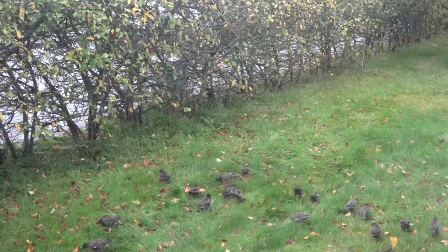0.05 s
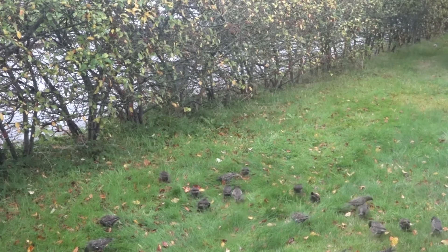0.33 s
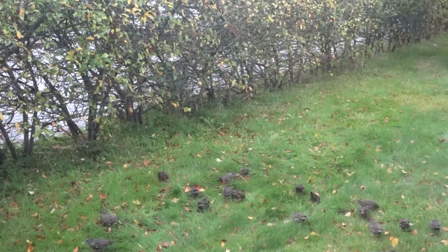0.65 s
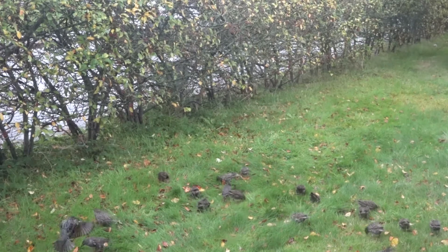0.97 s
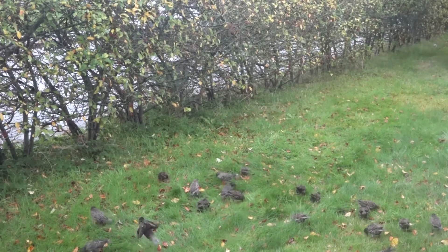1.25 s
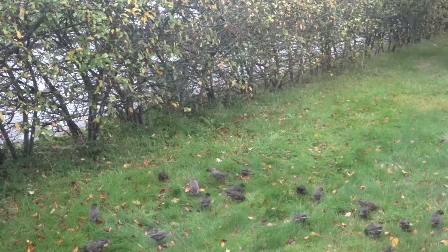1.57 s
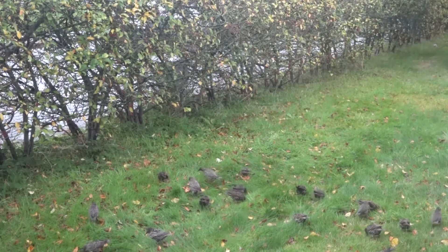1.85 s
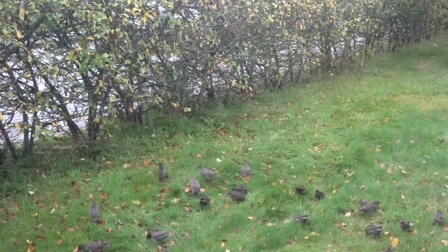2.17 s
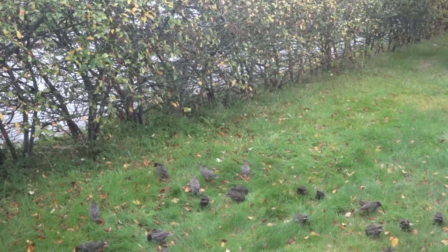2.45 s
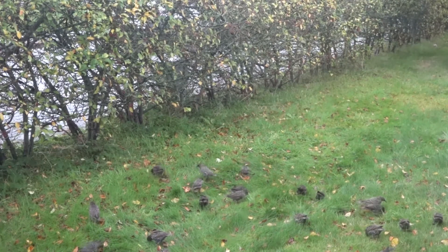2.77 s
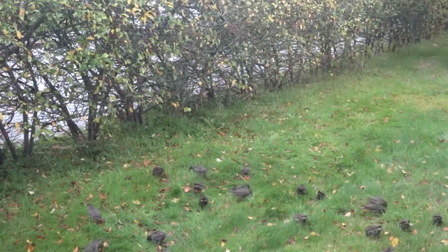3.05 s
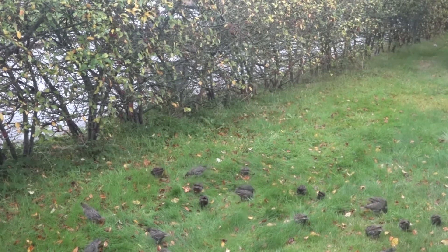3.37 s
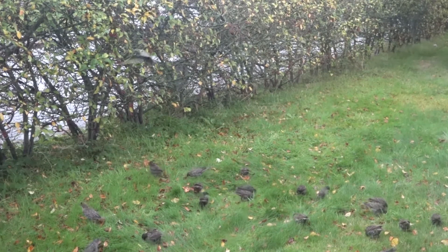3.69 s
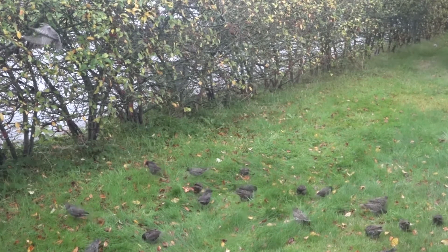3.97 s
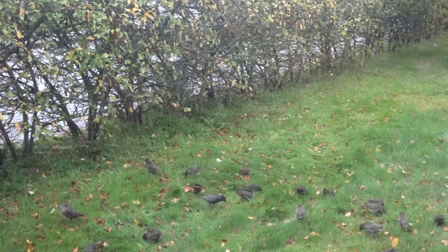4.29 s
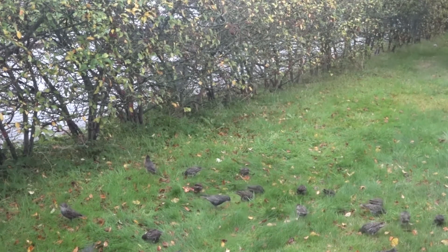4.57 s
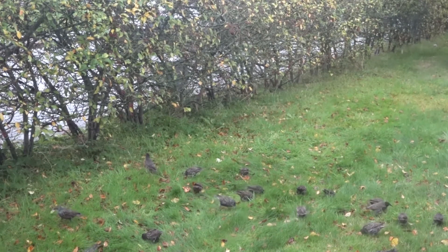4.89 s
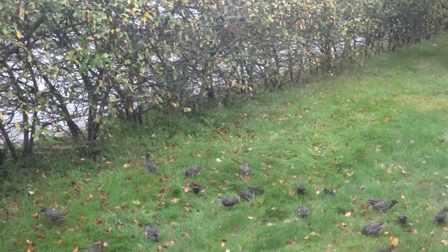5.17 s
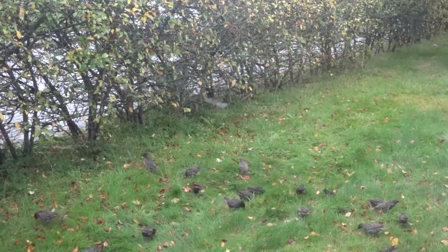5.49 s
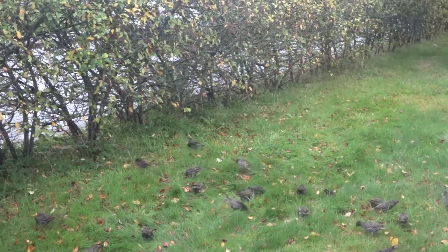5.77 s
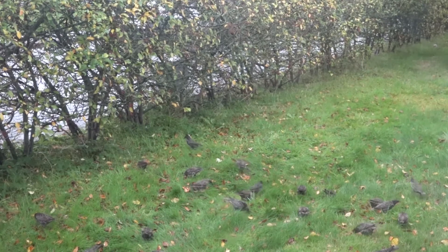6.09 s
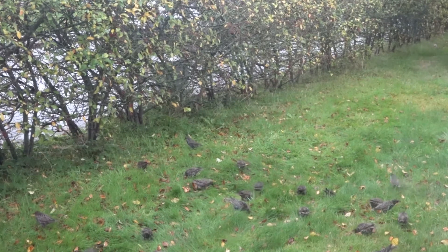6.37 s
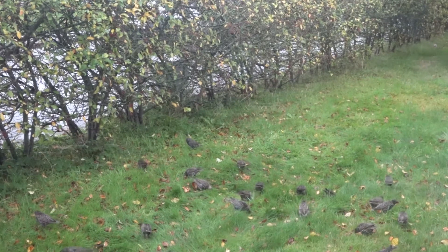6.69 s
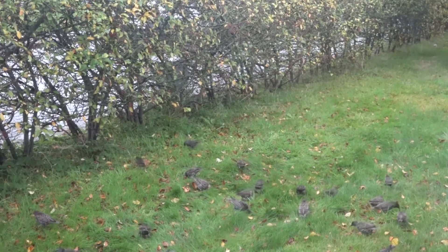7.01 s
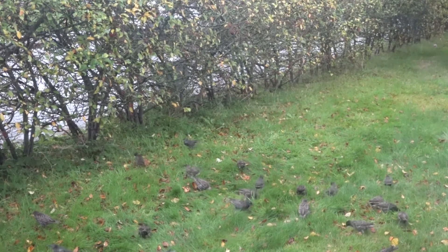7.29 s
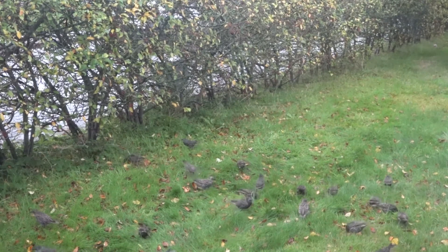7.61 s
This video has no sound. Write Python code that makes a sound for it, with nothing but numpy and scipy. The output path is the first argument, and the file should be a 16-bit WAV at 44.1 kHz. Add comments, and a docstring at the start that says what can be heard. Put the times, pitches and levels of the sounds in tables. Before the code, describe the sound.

A flock of starlings calls on a lawn beside a hedge for nearly eight seconds, making a dense, bright chatter with only tiny lulls. Near birds, mostly to the right, overlap short thin whistles, buzzy trills, harsh creaky rasps, sharp pips and little runs of dry bill clicks. Behind them, many more twitter, scold and pipe steadily. Quick pips stand out around 0.6 and 1.3 seconds, and rasps around 2.3, 3, 4.7, 5.5 to 6 and 7 seconds. Lower, fluty notes come through at about 4.5, 6.4 and 7.4 seconds. The calls carry a slight, short outdoor echo. Underneath, a light breeze makes a soft, uneven rush, and a distant motor hums very faintly. A soft, low puff of wind brushes the microphone at about 7.3 seconds while the birds keep calling.

```python
"""Thin arched whistles, buzzy trills, harsh rasps and bill clicks sound close by, mostly to the right,
over the chatter of many birds farther off: a flock of starlings is feeding on a lawn by a hedge.
A bird sings with its syrinx, a two-sided voice box: a steady tone whistles, uneven pulses rasp.
The hedge scatters every call; under it lie a faint distant motor and a little wind on the microphone."""
import sys
import numpy as np
from scipy import signal
from scipy.fft import rfft, irfft, next_fast_len
from scipy.io import wavfile

SR = 44100
rng = np.random.default_rng(int(sys.argv[2]) if len(sys.argv) > 2 else 0)


def log_audio(samples):
    """Write samples as a 16-bit WAV file to the path given in sys.argv[1]."""
    # one column per channel
    frames = np.atleast_2d(samples).T
    # limit to full scale, then quantise
    limited = np.clip(frames, -1, 1)
    pcm = np.round(limited * 32767).astype(np.int16)
    wavfile.write(sys.argv[1], SR, pcm)


N = 337365
CALL_T = np.arange(SR // 4) / SR  # seconds within one call
HIGH_HZ = 5430  # divides the thin, high sounds from the lower ones


def whistlers():
    """Near birds whistle, the pitch tracing a tilted arch; the high ones sit farther to the right."""
    # thin high whistles, then low fluty ones: t/s, length/s, f/Hz, glide/Hz, level/dB, buzz/0-1
    whistles = [ (0, 0.096, 11150, 98, -46, 0.3), (0, 0.038, 7350, -300, -35.5, 0.1),
                (0.074, 0.053, 6270, 0, -35, 0.83), (0.917, 0.063, 7300, -500, -43, 0.27),
                (1.022, 0.09, 8250, 120, -36, 0.03), (1.153, 0.063, 7660, 700, -36.5, 0.8),
                (1.276, 0.055, 7830, 1102, -35.5, 0.4), (1.383, 0.099, 6450, -1100, -38.5, 0.8),
                (1.56, 0.048, 8140, 150, -32, 0.17), (1.622, 0.072, 8500, 202, -34, 0.04),
                (1.688, 0.056, 7500, -400, -30, 0.16), (1.903, 0.057, 7230, 400, -38, 0.3),
                (2.084, .073, 8130, 400, -38, 0.73), (2.255, 0.1, 8230, -1100, -35.5, 0.5),
                (2.348, 0.15, 7220, -150, -32.5, 0.3), (2.395, 0.088, 7840, 0, -37, 0.04),
                (2.506, 0.069, 7780, 200, -34.5, 0.4), (2.764, 0.099, 8150, 302, -39, .2),
                (2.876, 0.089, 6730, -100, -37, 0.02), (2.9, 0.08, 8420, -80, -39.5, 0),
                (2.92, 0.09, 7270, -600, -37, 0.06), (3.02, 0.032, 7350, 300, -30.5, 0.57),
                (3.077, .075, 6550, 0, -39.5, 0.6), (3.16, .125, 8070, 200, -38, 0.48),
                (3.825, 0.18, 7030, -600, -38.5, 0.75), (4.094, 0.19, 7930, -100, -38, 0.16),
                (4.353, 0.033, 8130, -100, -35, 0.2), (4.514, 0.036, 6600, 0, -37, 0.34),
                (4.67, 0.03, 7450, 200, -36, 0.5), (4.734, 0.047, 7680, 400, -34, 0.83),
                (4.981, 0.059, 8330, -100, -35.5, 0.25), (5.107, 0.072, 8300, 0, -40, 0.2),
                (5.247, 0.026, 7950, 340, -35, 0.8), (5.424, 0.032, 8000, -300, -36.5, 0.4),
                (5.947, 0.089, 8160, -100, -40, 0.02), (6.098, 0.016, 8070, 0, -34.5, 0.63),
                (6.679, 0.17, 7580, -150, -35, 0.49), (6.735, 0.045, 6700, 100, -40, 0),
                (6.958, 0.077, 8700, 100, -40.5, 0.03), (7.07, .05, 5830, -50, -41, .05),
                (7.113, 0.035, 7580, -900, -34, .1), (7.229, 0.063, 8260, 250, -30, 0.3),
                (7.239, 0.052, 6470, -1400, -33.5, 0.45), (7.309, 0.095, 8100, -200, -42, 0.43),
                (7.444, .048, 8320, -250, -33, .25), (7.56, .2, 6600, 2, -33, 0.14),
                (1.275, 0.052, 2390, -80, -44.5, 0.1), (1.96, 0.071, 2550, 56, -40, .03),
                (2.059, 0.14, 2700, -58, -42, 0), (0.018, .13, 1409, 0, -48.5, .3),
                (.61, 0.193, 2690, 1, -46, 0.13), (2.224, 0.046, 1576, -120, -45, .1),
                (5.178, 0.041, 3500, 2, -42.5, 0.2), (0.936, 0.038, 2660, 60, -39.5, 0.24),
                (2.671, 0.069, 2656, 42, -40.5, 0.2), (3.321, 0.29, 2590, -8, -44, 0.28),
                (3.86, .11, 2780, 101, -39.5, 0.38), (7.042, 0.27, 1890, 96, -43, 0.66),
                (4.192, 0.075, 1665, -110, -44.5, 0.34), (4.465, 0.041, 2070, -32, -38, 0),
                (4.501, 0.026, 3145, -2, -31, 0.03), (4.799, 0.018, 2610, -100, -37, .1),
                (5.104, 0.054, 1360, 90, -43.5, .02), (6.172, 0.15, 2563, -100, -37.5, 0.24),
                (6.38, .11, 2630, -92, -31.5, .02), (7.419, 0.051, 2627, 150, -31.5, 0.08)]
    out = np.zeros((2, N))
    for s, length, hz, glide_hz, db, buzz in whistles:
        ends_hz = hz * (1 - 0.1406 * length)  # a longer whistle arches more
        call = note(length, ends_hz - glide_hz / 2, hz, ends_hz + glide_hz / 2, buzz)
        high = hz > HIGH_HZ
        if high:  # the other side of the syrinx squeaks along, lower and softer
            call = call + amp(-15) * note(length, *hz * rng.uniform(0.73, 1.0, size=3), buzz)
        add(out, s, amp(db) * call, right_db=(5.5 if high else 1) + rng.normal())
    return out


def note(length, first_hz, middle_hz, last_hz, buzz):
    """One syrinx tone curving through three pitches; buzz shakes it fast and breaks it into pulses."""
    t = CALL_T[:int(length * SR)]
    n, progress = len(t), t / length
    bulge_hz = middle_hz - (first_hz + last_hz) / 2
    arch = first_hz + (last_hz - first_hz) * progress + bulge_hz * 4 * progress * (1 - progress)
    trill = sine(rng.uniform(67.9, 151.5) * np.exp(0.352 * wobble(60.2, n)))
    shake = buzz * (0.0777 * wobble(748.7, n) + 0.047 * trill)
    pitch = arch * (1 + shake + 0.00784 * wobble(67.2, n))
    pulses = amp(np.sqrt(buzz) * (1.8 * trill + 3.6 * wobble(402, n)))
    flutter = amp(2 * wobble(127, n))
    return unit(swell(t, length, edge=0.12) * pulses * flutter * sine(pitch))


def squabblers():
    """Near birds rasp: a creaking voice breaks through a wider, ragged hiss that the syrinx chops."""
    # harsh rasps: t/s, length/s, voice f/Hz, hiss width/Hz, hiss level/dB, voice level/dB
    rasps = [ (0, 0.18, 5270, 2240, -38, -43), (0.455, .08, 4850, 1200, -43.5, -44),
             (0.616, 0.092, 4930, 2790, -34.5, -36.5), (.83, 0.045, 4560, 2930, -37, -38.5),
             (1.051, 0.055, 4400, 1900, -40, -37), (1.173, .11, 4530, 2000, -35.5, -43),
             (1.548, 0.28, 4620, 1840, -36.5, -42), (2.275, 0.072, 4970, 2400, -29, -40),
             (2.427, 0.052, 4550, 3180, -36.5, -39), (2.984, 0.065, 4630, 2600, -31.5, -34),
             (3.414, 0.014, 4760, 4200, -37.5, -40), (3.669, 0.067, 4300, 2370, -35.5, -36),
             (3.984, 0.091, 4500, 2880, -36.5, -49), (4.144, 0.047, 4920, 3800, -39.5, -30),
             (4.382, 0.038, 4660, 2500, -32, -36), (4.651, 0.042, 5600, 3900, -30.5, -41),
             (4.74, 0.062, 4920, 2000, -33, -37), (5.064, .043, 5140, 1390, -52, -38.5),
             (5.513, 0.08, 5900, 2300, -32, -42), (5.61, .053, 4740, 2510, -31.5, -39.5),
             (5.864, 0.14, 4430, 1200, -40, -41), (6.003, 0.042, 5150, 2400, -34, -30),
             (6.322, 0.021, 5200, 4000, -44.5, -48), (6.561, 0.032, 4580, 2900, -37, -31.5),
             (6.643, 0.1, 4730, 900, -59, -38), (6.935, 0.061, 5160, 2400, -29, -35),
             (7.485, 0.07, 5030, 3200, -32.5, -47), (7.561, 0.19, 4840, 1790, -31, -49)]
    out, n = np.zeros((2, N)), len(CALL_T)
    for s, length, hz, width, hiss_db, voice_db in rasps:
        centre = 4220 + width / 2  # a harsher hiss spreads upward from the same lower edge
        chop_hz = 150 * np.exp(0.35 * wobble(50, n))
        chop = amp(5 * sine(chop_hz))
        hiss = 0
        for band_hz in (centre - width / 4, centre + width / 4):  # each half sputters on its own
            sputter = chop * amp(4.5 * wobble(110, n)) * rng.standard_normal(n)
            hiss += filtered(sputter, lambda f: 1 / (1 + (abs(f - band_hz) / (0.67 * width)) ** 2.15))
        right_db = 1.5 + rng.normal()
        add(out, s, amp(hiss_db) * unit(hiss) * swell(CALL_T, length, edge=0.45), right_db)
        voice = creak(0.87 * length, hz, glide_hz=300 * rng.normal())
        add(out, s + 0.2 * length, amp(voice_db) * voice, right_db)
    return out


def creak(length, hz, glide_hz):
    """A harsh, fading voice: uneven syrinx pulses, each ringing briefly near one sliding pitch."""
    pulse_hz, ring_s, fade_db = 294, 0.0013, 6.5
    t = CALL_T[:int(length * SR)]
    rate = pulse_hz * np.exp(0.27 * wobble(200, len(t)))
    pulse = np.cumsum(rate / SR).astype(int)
    age = t - t[np.searchsorted(pulse, pulse)]  # seconds since this pulse began
    strength, detune = rng.standard_normal((2, 256))[:, pulse % 256]
    pitch = (hz + glide_hz * (t / length - 0.5)) * (1 + 0.037 * detune)
    ring = age * np.exp(-2 * age / ring_s) * np.sin(2 * np.pi * pitch * age)
    return unit(swell(t, length, edge=0.29) * amp(2 * strength - fade_db * t / length) * ring)


def pips():
    """Near birds give tiny, sharp notes that mostly rise, alone or in quick runs."""
    # single pips: middle t/s, length/s, f/Hz, level/dB
    singles = [ (.553, 0.0049, 6900, -28), (.564, .0054, 7170, -29), (.5705, 0.0056, 7000, -25),
               (.643, .0053, 7630, -30), (1.3125, .005, 8100, -26), (1.3215, 0.0094, 8230, -27),
               (1.575, .012, 3680, -36), (1.603, 0.0032, 4260, -31), (2.301, 0.0059, 4940, -31),
               (2.449, .0061, 7240, -32), (4.247, .012, 8240, -33), (4.416, .014, 5920, -33),
               (4.79, .008, 3000, -33), (4.81, 0.011, 8700, -35.5), (4.813, .01, 4960, -31),
               (5.729, .013, 4930, -32), (6.127, 0.0097, 8230, -29.5), (6.791, .007, 5080, -29)]
    # runs of pips: t/s, f/Hz, level/dB, length/s
    trills = [(0.696, 5100, -35.5, .065), (0.879, 7350, -32, .025), (1.343, 7480, -28, .043)]
    pip_s, spacing_s, rise_share = 0.0049, 0.009, 0.062
    runs = [(s + delay, pip_s, hz, db)
            for s, hz, db, length in trills for delay in np.arange(0, length, spacing_s)]
    out = np.zeros((2, N))
    for s, length, hz, db in singles + runs:
        t = CALL_T[:int(length * SR)]
        extra_db, detune, sweep = rng.standard_normal(3)
        pitch = hz * (1 + 0.0068 * detune + rise_share * (1 + sweep) * (t / length - 0.5))
        pip = unit(swell(t, length, edge=0.25) * sine(pitch))
        add(out, s - length / 2, amp(db + extra_db) * pip, right_db=5 if hz > HIGH_HZ else 2)
    return out


def bill_clicks(run_count):
    """Short, uneven runs of dry clicks, each ringing briefly in the bill."""
    out, t = np.zeros((2, N)), CALL_T[:SR // 100]
    for when, height, distance in rng.random((run_count, 3)):
        snap = amp(-60 * t / 0.004) * (1 - np.exp(-t / 0.0001))
        click = snap * np.sin(2 * np.pi * (3800 + 4200 * height) * t)
        for delay in np.cumsum(rng.uniform(0.01, 0.05, rng.integers(1, 5))):
            add(out, when * N / SR + delay, amp(-19.5 - 8 * distance) * click, right_db=3)
    return out


def flock():
    """Far birds murmur, pipe and glide; birds in the hedge scold and twitter, with brief lulls."""
    # how loud the two groups are: t/s, far level/dB, hedge level/dB
    loudness = [(0.0, -36.5, -39), (0.94, -39, -42.5), (1.64, -37.5, -38.5), (3.88, -36, -39),
                (4.67, -34.5, -36), (5.03, -39.5, -38), (5.47, -34.5, -41.5), (5.65, -36, -38.5),
                (7.65, -35, -36.5)]
    # tone colour of the far birds: f/Hz, level/dB
    far_colour = [(700, -43), (1400, -9), (1700, -11.5), (2000, -1.5), (2250, -17.5), (2450, -1), (2630, 0),
                  (2850, -10), (3120, -1.5), (3500, -11.5), (4200, -22), (6000, -36)]
    # tone colour of the hedge birds: f/Hz, level/dB
    hedge_colour = [(2500, -45), (3500, -10.5), (4450, 0.5), (4950, 0), (5500, -4.5), (6500, -5),
                    (7400, -1), (8200, -3), (8800, -2), (9800, -19), (11000, -28.5), (14000, -46)]
    # strength of the hedge birds' harsh lower sounds: t/s, level/dB
    scolding = [(0, 0.5), (2.4, -0.5), (2.8, -1.5), (3.5, -1), (3.9, -0.5), (5.8, -2), (6.2, -2), (7.1, -1),
                (7.65, -1)]
    # moments when the hedge birds quieten: middle t/s, half length/s
    lulls = [(0.238, 0.027), (1.446, 0.084), (0.95, 0.033), (1.796, 0.036), (2.195, 0.022), (3.243, .05),
             (3.784, 0.02), (4.33, 0.057), (4.905, 0.03), (5.014, 0.025), (5.415, 0.038), (6.075, 0.02),
             (6.38, 0.02)]
    far_db, hedge_db = curves(loudness)

    murmur = crowd(1500, 3700, length=0.035, glide=0.0449, buzz=0.75, count=850)
    piping = crowd(2580, 2690, length=0.13, glide=0.0121, buzz=0.09, count=150)
    glides = crowd(1750, 3500, length=0.06, glide=0.05, buzz=0.1, count=55)
    far = coloured(murmur + 2.4 * wide_noise(side_db=-9.5), far_colour) + amp(-13) * piping
    far = (amp(far_db - 3) * far + amp(-52.5) * glides) * panned(1)

    chatter = crowd(3600, 5700, length=0.03, glide=0.04, buzz=0.95, count=480)
    twitter = crowd(5700, 8200, length=0.03, glide=0.035, buzz=0.2, count=480)
    faint_whistles = crowd(6200, 8300, length=0.035, glide=0.03, buzz=0.12, count=90)
    hedge = coloured(chatter + twitter + 1.3 * wide_noise(side_db=-7), hedge_colour)
    hedge = amp(hedge_db + 2.06) * hedge * panned(3.6)
    scold = filtered(hedge, lambda hz: hz < HIGH_HZ)
    hedge = hedge - scold + amp(*curves(scolding)) * scold
    hedge += amp(-48) * faint_whistles * panned(9.1)
    lull_db = -6 * sum(np.exp(-((np.arange(N) / SR - s) / half) ** 2) for s, half in lulls)
    return far + amp(lull_db) * hedge


def crowd(low_hz, high_hz, length, glide, buzz, count):
    """Many birds at once, each note with its own pitch, arch, roughness, distance and direction."""
    out = np.zeros((2, N))
    for k, (when, height, rough, stretch, distance) in enumerate(rng.random((count, 5))):
        pitches = (low_hz + height * (high_hz - low_hz)) * np.exp(glide * rng.standard_normal(3))
        call = note(length * (0.5 + stretch), *pitches, buzz * (0.5 + rough))
        s = (k + when) / count * N / SR - length / 2
        add(out, s, amp(-5 * distance) * call, right_db=rng.normal(0, 6))
    return unit(out)


def scatter(calls):
    """Twigs and ground throw each call back as a short, blurred echo."""
    # how long the echo lasts: f/Hz, time to fade by 60 dB/s
    fade_times = [(500, 0.024), (2500, 0.14), (8000, 0.41), (14000, 0.16)]
    hz, t, bands = signal.stft(rng.standard_normal((2, SR // 2)), SR, nperseg=256)
    fade = amp(-60 * t / along(fade_times, hz)[:, None])
    tail = signal.istft(bands * fade, SR, nperseg=256)[1]
    tail = np.pad(tail, ((0, 0), (SR // 200, 0)))  # arrives 5 ms late
    return signal.fftconvolve(calls, tail / np.linalg.norm(tail[0]), axes=1)[:, :N]


def outdoor_air():
    """A light breeze makes a soft, uneven rush."""
    # strength of the rush: t/s, level/dB
    breeze = [(0, -39.5), (2.2, -41), (5.5, -40.5), (7.3, -37)]
    # its tone colour: f/Hz, level/dB
    colour = [(35, -1), (100, -10), (160, -7), (230, 0), (480, -6), (850, -1), (1300, -3), (2500, 1.5),
              (6000, -4), (10000, -23.5), (13000, -52)]
    mid, side = rng.standard_normal((2, N))
    side = filtered(side, lambda hz: 0.38 * hz ** 2 / (hz ** 2 + 300 ** 2))  # same bass on both sides
    rush = coloured(np.array([mid + side, mid - side]), colour)
    return amp(curves(breeze)[0] + wobble(11)) * rush * panned(-0.76)


def distant_motor():
    """A motor hums, its tones wavering in strength and pitch."""
    # tones of the hum: f/Hz, level/dB
    tones = [(65, -58), (133.6, -65.5), (223, -64)]
    return sum(amp(db + 4.2 * wobble(4.9)) * np.sqrt(2) * sine(hz * (1 + 0.0248 * wobble(12)))
               for hz, db in tones)


def wind_puffs():
    """Puffs of wind hit the microphone and make a low rumble."""
    # strength of the puffs: t/s, level/dB
    puffs = [(0, -60.5), (3.1, -58), (3.55, -52.5), (3.85, -58.5), (7.18, -60), (7.3, -42.5), (7.42, -59)]
    # their tone colour: f/Hz, level/dB
    colour = [(15, -28), (40, -3), (110, 3), (220, -5.5), (600, -39), (2000, -100)]
    return amp(curves(puffs)[0]) * coloured(wide_noise(side_db=-53), colour)


def amp(db):
    """Turn decibels into a multiplier."""
    return 10 ** (np.asarray(db) / 20)


def unit(x):
    """Scale to an average strength (rms) of 1."""
    return x / np.sqrt(np.mean(x ** 2) + 1e-20)


def sine(hz):
    """A pure tone that follows a changing pitch."""
    return np.sin(2 * np.pi * np.cumsum(hz) / SR)


def swell(t, length, edge):
    """Fade a call in and out, each over the share edge of its length."""
    return np.sin(np.pi / 2 * np.clip(np.minimum(t, length - t) / (edge * length), 0, 1))


def wobble(rate, size=N):
    """A wandering curve through rate random points a second."""
    points = rng.standard_normal(256)
    return np.interp(np.arange(size) * rate / SR, np.arange(len(points)), points)


def along(points, hz):
    """Read between (f/Hz, value) points on a log frequency scale."""
    f, values = np.transpose(points)
    return np.interp(np.log(hz + 1), np.log(f + 1), values)


def curves(rows):
    """One value per sample for each column after the time."""
    s, *columns = np.transpose(rows)
    return [np.interp(np.arange(N) / SR, s, column) for column in columns]


def filtered(x, response):
    """Multiply each frequency in x by response(hz)."""
    size = next_fast_len(x.shape[-1] + 4096)
    return irfft(rfft(x, size) * response(np.fft.rfftfreq(size, 1 / SR)), size)[..., :x.shape[-1]]


def coloured(x, colour):
    """Give x a tone colour, at strength 1."""
    return unit(filtered(x, lambda hz: amp(along(colour, hz))))


def wide_noise(side_db):
    """Stereo noise; a lower side_db makes it narrower."""
    mid, side = rng.standard_normal((2, N))
    return unit(np.array([mid + amp(side_db) * side, mid - amp(side_db) * side]))


def panned(right_db):
    """Left and right multipliers for a direction."""
    return amp([[-right_db / 2], [right_db / 2]])


def add(out, s, call, right_db):
    """Place a call in time and direction."""
    start = int(np.clip(s * SR, 0, N - 1))
    out[:, start:start + len(call)] += panned(right_db) * call[:N - start]


def scene():
    """Near birds and the flock behind them, echoed by the hedge, over air, motor and wind."""
    near = whistlers() + squabblers() + pips() + bill_clicks(run_count=32)
    birds = amp(-1.16) * near + flock()
    return birds + amp(-7) * scatter(birds) + outdoor_air() + distant_motor() + wind_puffs()


def record(dry):
    """The whole sound is brightest near 10 kHz, dull above that, and silent over top_hz."""
    treble = [(8700, -0.5), (9800, 6.0), (11000, -8.0), (14000, -11.0)]  # f/Hz, level/dB
    top_hz = 14400
    return filtered(dry, lambda hz: amp(along(treble, hz)) * (hz < top_hz))


dry = scene()
out = record(dry)
log_audio(out)
```